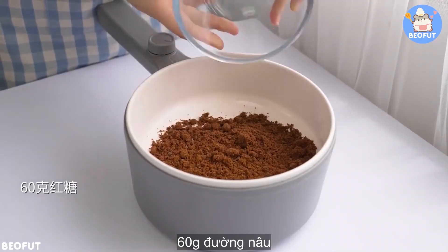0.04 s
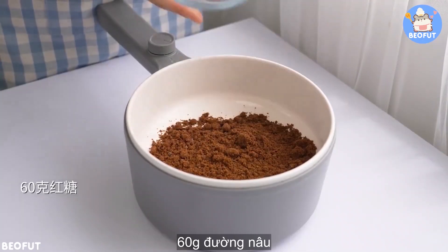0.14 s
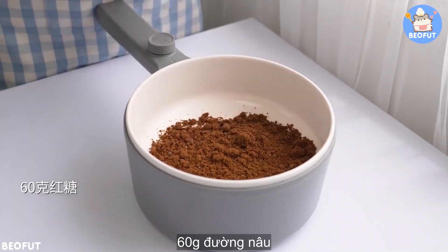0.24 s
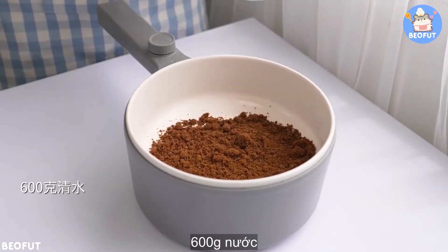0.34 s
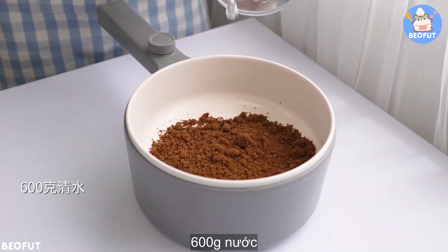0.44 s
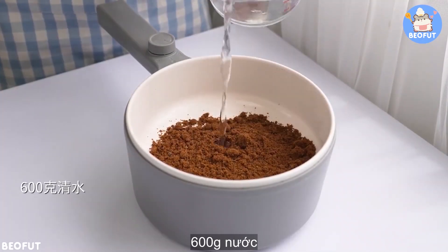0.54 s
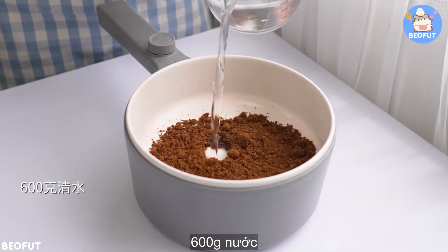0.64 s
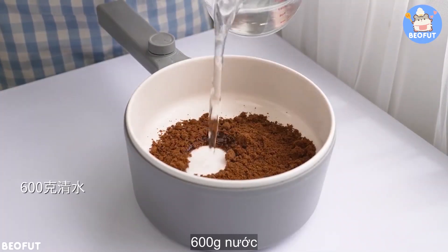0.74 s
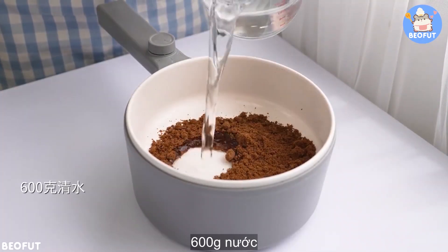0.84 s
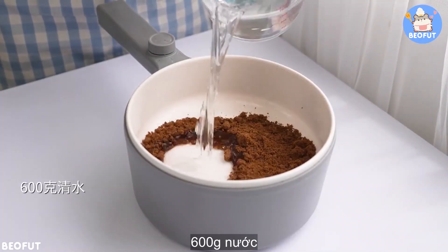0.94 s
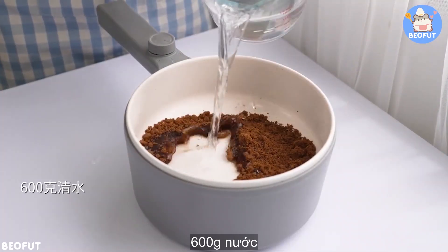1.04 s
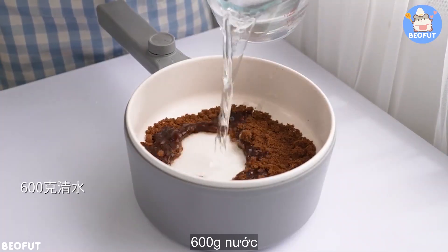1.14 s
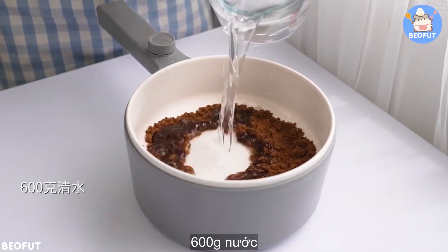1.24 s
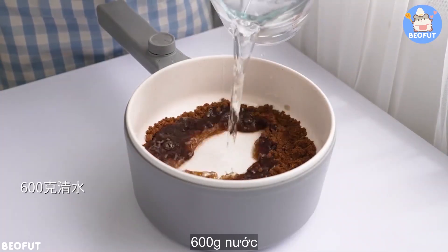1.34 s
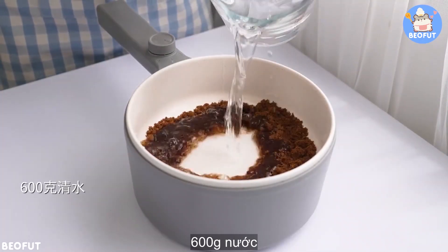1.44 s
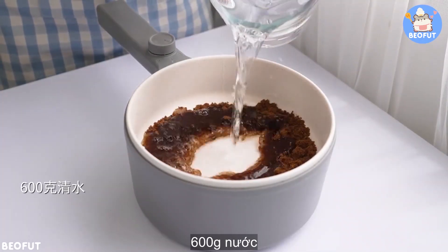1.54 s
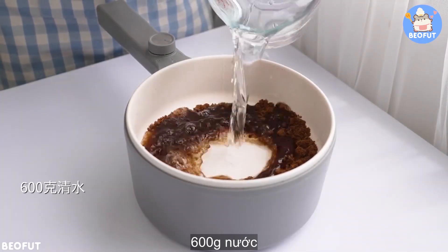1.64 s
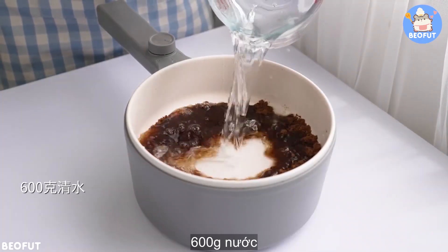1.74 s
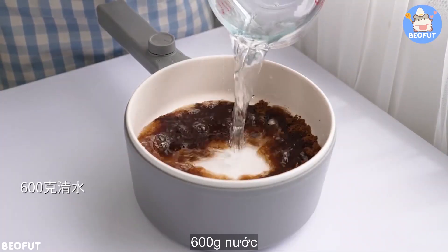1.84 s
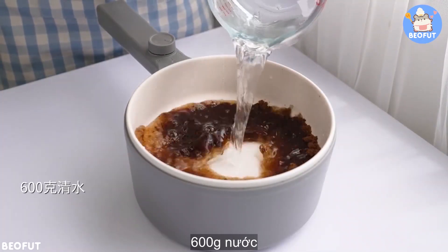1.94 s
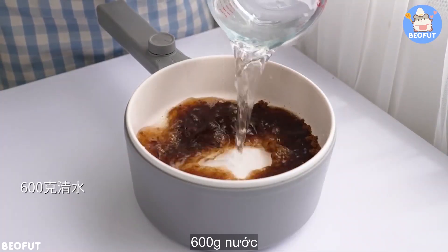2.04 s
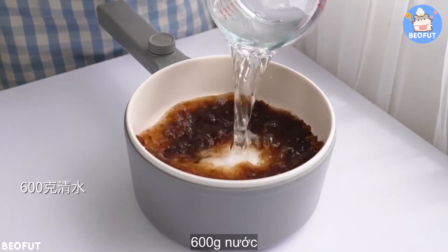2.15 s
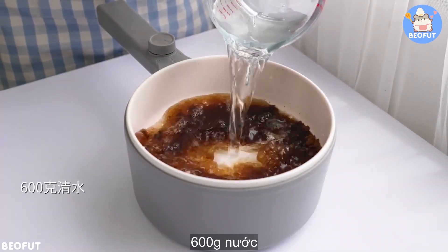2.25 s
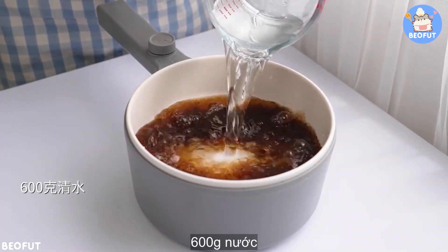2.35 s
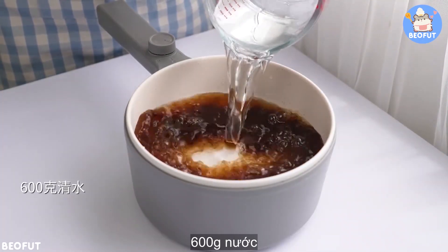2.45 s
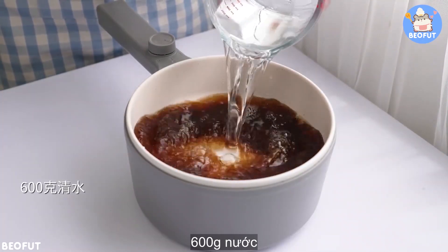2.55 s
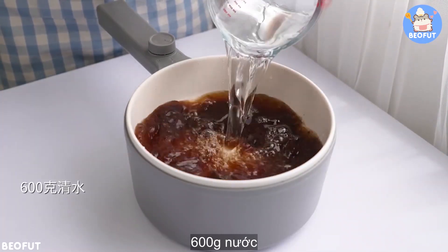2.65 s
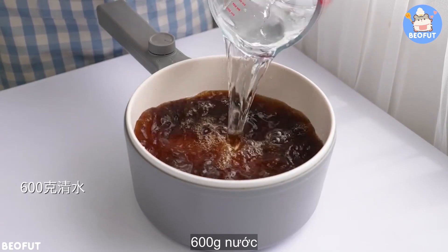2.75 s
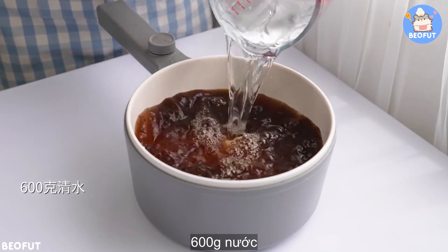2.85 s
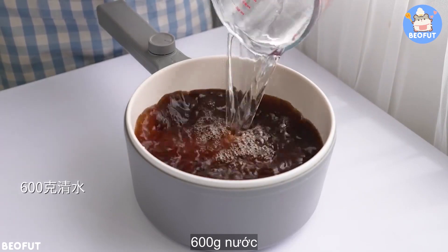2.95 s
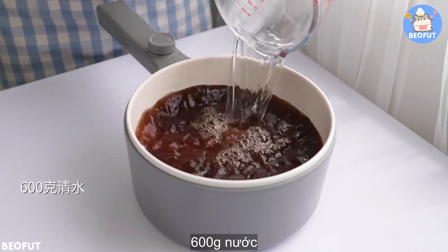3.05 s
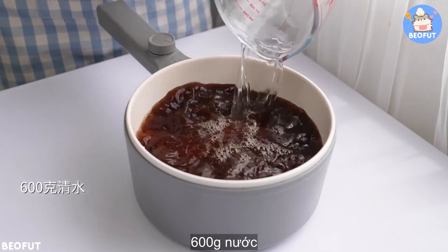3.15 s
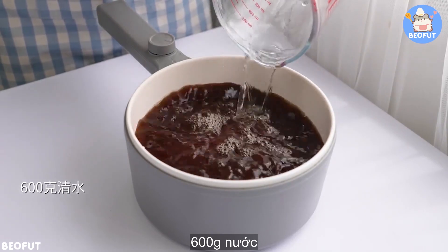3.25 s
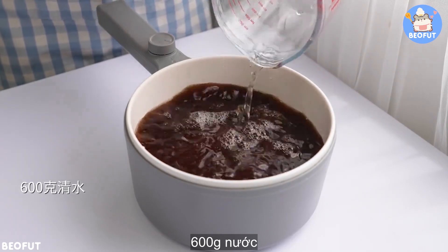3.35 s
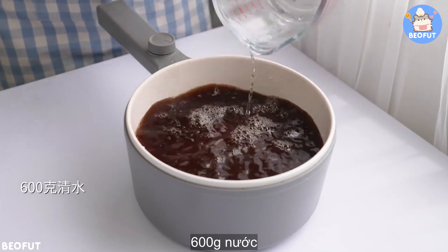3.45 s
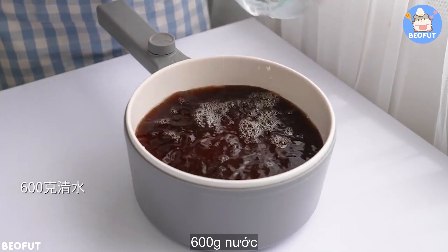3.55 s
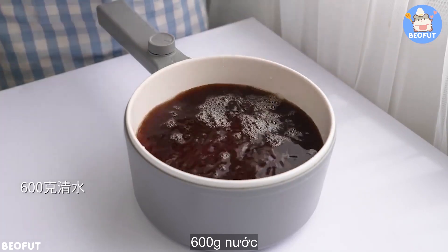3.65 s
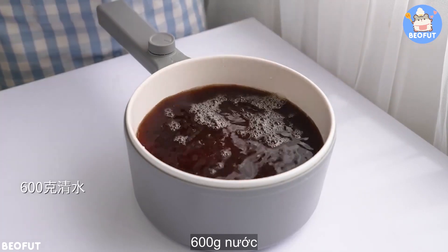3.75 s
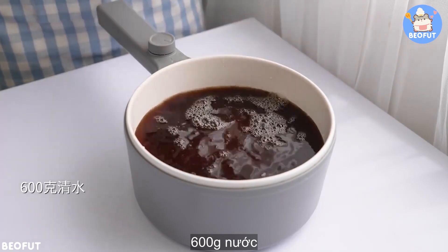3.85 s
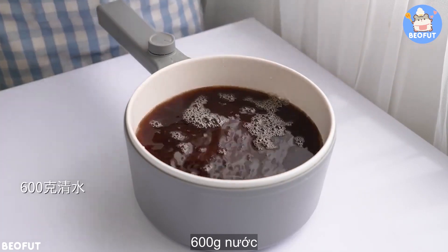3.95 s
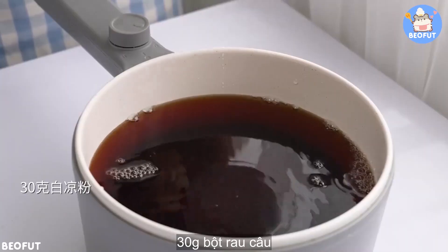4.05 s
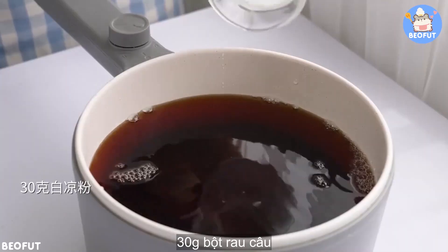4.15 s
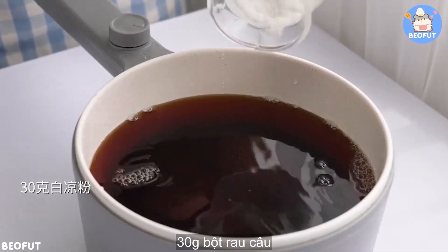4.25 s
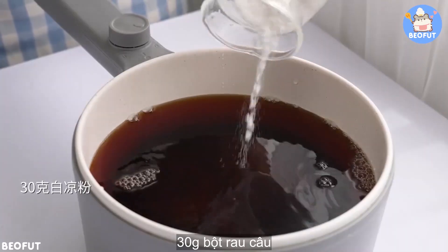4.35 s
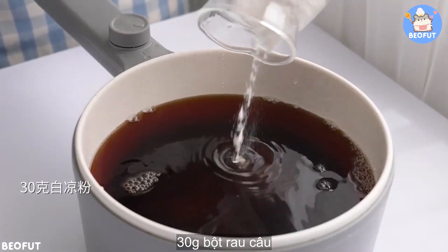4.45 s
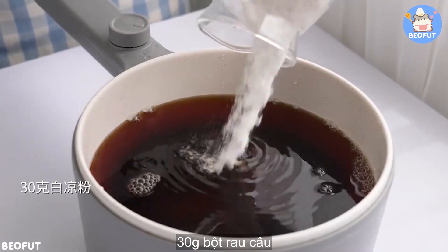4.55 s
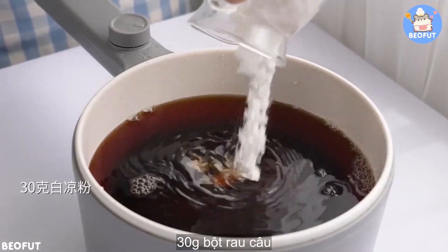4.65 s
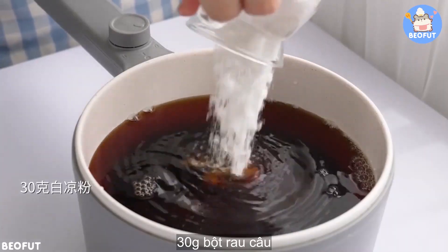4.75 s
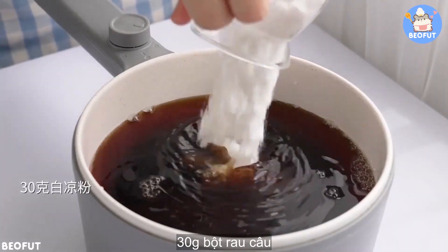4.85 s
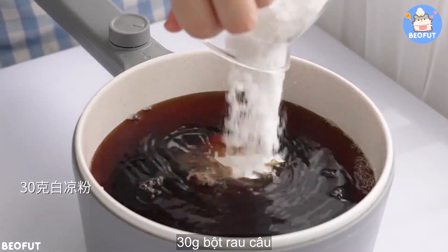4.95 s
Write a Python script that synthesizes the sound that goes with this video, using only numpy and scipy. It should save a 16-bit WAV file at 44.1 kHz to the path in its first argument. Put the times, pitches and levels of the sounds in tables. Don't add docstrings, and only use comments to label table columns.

```python
import sys
import numpy as np
from scipy import signal
from scipy.fft import rfft, irfft
from scipy.io import wavfile
from scipy.ndimage import uniform_filter1d

SR = 44100
rng = np.random.default_rng(int(sys.argv[2]) if len(sys.argv) > 2 else 0)


def file_out(sig):
    cols = np.atleast_2d(sig).T
    lim = np.clip(cols, -1, 1)
    pcm = np.round(lim * 32767).astype(np.int16)
    wavfile.write(sys.argv[1], SR, pcm)


def attenuation_scalar(level_db):
    decades = np.asarray(level_db, float) / 20
    return 10 ** decades


N = 221107
POURING_SAMPLES = 4 * SR

# time_s, flow_db
FLOW = [(0.68, -23), (0.73, -11.5), (0.85, -13), (0.92, -9.5), (1.07, -6), (1.36, 0.5), (1.57, -4.5),
        (1.79, -1.5), (2.18, -3), (2.52, -0.5), (2.72, -5.5), (2.89, -12), (3.06, -15), (3.3, -6),
        (3.45, -9.5), (3.655, -13.5), (3.72, -20)]
# freq_hz, density_db_per_hz
FROTH_COLOUR = [(590, -58), (1000, -10.5), (1370, 9.5), (1750, -6), (2050, -12), (2470, -12), (2680, -14),
                (2940, -10.5), (3500, -11.5), (3800, -13.5), (6700, -14.5), (7620, -11), (13900, -13),
                (15100, -10), (16000, -16.5)]


def evened(x):
    return x / np.sqrt(np.mean(x ** 2) + 1e-20)


def read(points, hz):
    f, value = np.transpose(points)
    return np.interp(np.log(hz + 1), np.log(f + 1), value)


def curve(rows):
    rows = np.array(rows)
    return attenuation_scalar(np.interp(np.arange(N) / SR, rows[:, 0], rows[:, 1], -120, -120))


def add(mix, start_s, sound, pan_db):
    part = mix[:, round(start_s * SR):][:, :len(sound)]
    part += attenuation_scalar(np.array([[pan_db / 2], [-pan_db / 2]])) * sound[:part.shape[1]]


def noise(colour, same, patchy_db, size=512, lean=((1, 0), (2, 0)), wide=6, long=10):
    hz = np.fft.rfftfreq(size, 1 / SR)
    a, b, c, d, patches = rng.standard_normal((4 * N // size + 5, len(hz), 5)).T
    patches = uniform_filter1d(patches, size=int(wide), axis=0)
    patches = evened(uniform_filter1d(patches, size=int(long), axis=1))
    same = np.clip(same(hz) * np.ones(len(hz)), 0, .96)[:, None]
    left = a + 1j * b
    z = np.array([left, same * left + np.sqrt(1 - same ** 2) * (c + 1j * d)])
    z *= attenuation_scalar(colour(hz)[:, None] + patchy_db * patches)
    z *= attenuation_scalar(np.array([.5, -.5])[:, None, None] * read(lean, hz)[:, None])
    return evened(signal.istft(z, nperseg=size, noverlap=3 * size // 4)[1][:, :N])


def ring(hz, cycles, rise=0.0016):
    turns = np.arange(int(5 * cycles * SR / hz) + 2) * hz / SR
    u = turns / (1.56 * cycles)
    envelope = (u * np.exp((1 - u ** 1.57) / 1.18)) ** 2.04
    return envelope * np.sin(2 * np.pi * turns * (1 + rise * turns / 2))


def burst(rows, t60_s, broad, lean_db, crack):
    mix = np.zeros((2, N))
    t = np.arange(2048) / SR
    hz = np.fft.rfftfreq(2048, 1 / SR)
    for (start_s, db, top_hz), spray in zip(rows, rng.standard_normal((len(rows), 2048))):
        hump = np.exp(-((hz - top_hz) / (.15 * top_hz)) ** 2)
        colour = 1 / (1 + (2500 / (hz + 1)) ** 4) * (broad + 0.8 * hump)
        shape = attenuation_scalar(db - 7.5 - 60 * t / max(t60_s, .004)) * np.minimum(t / 0.0019, 1) ** 1.2
        shape *= 1 + crack * np.exp(-((t - .002) / 0.0005) ** 2)
        add(mix, start_s - .0010, shape * evened(irfft(rfft(spray) * colour)), lean_db + 7.4 * spray[0])
    return mix


def swarm(lo_hz, hi_hz, per_s, cycles, spread_db, count=16):
    mix = np.zeros((2, N))
    for hz in np.geomspace(lo_hz, hi_hz, count):
        when, size, side, chance = rng.random((1500, 4)).T
        born = chance < per_s / count * POURING_SAMPLES / SR / len(when)
        size = attenuation_scalar(spread_db * np.minimum(-np.log(size + 1e-9), 4.5))
        grain = ring(hz, cycles)
        grain = attenuation_scalar(read(FROTH_COLOUR, hz)) * np.sqrt(hz) * grain / np.linalg.norm(grain)
        starts = (when[born] * POURING_SAMPLES).astype(int)
        places = (starts[:, None] + np.arange(len(grain))).ravel()
        for ear, lean in enumerate([side - .6, .6 - side]):
            gains = (size * attenuation_scalar(8.0 * lean))[born]
            mix[ear] += np.bincount(places, np.outer(gains, grain).ravel(), N)
    return evened(mix)


def slide():
    trickle_db, trickle_t60_s, wait_db = -40.5, .12, -56.5
    slide_s, slide_db, rise_s, run_out_db, run_out_s = 0.051, -25.5, 0.00088, -59, 0.3
    lump_s, lump_db, lump_half_s = 0.058, -22, 0.004
    t = np.arange(N) / SR
    since = np.maximum(t - slide_s, 0)
    run_db = np.maximum(slide_db + run_out_db * (since / run_out_s) ** 2.09, -200)
    run = np.minimum(since / rise_s, 1) * attenuation_scalar(run_db)
    lump = attenuation_scalar(lump_db) * np.exp(-((t - lump_s) / lump_half_s) ** 2)
    trickle = attenuation_scalar(trickle_db - 60 * np.minimum(t, 1) / trickle_t60_s) + attenuation_scalar(wait_db)
    return trickle * (t < slide_s) + run + lump


def sugar():
    # freq_hz, density_db_per_hz
    grit_colour = [(2940, -27), (5000, -36), (5810, -49), (5900, -31.5), (6600, -17), (6930, -12.5),
                   (9410, -5), (14300, -12), (15200, -26), (16000, -54)]
    dull_hz, dull_s = 12100, .13
    grit = noise(lambda hz: read(grit_colour, hz), lambda hz: .8, 1.2, size=256, wide=7, long=9.6)
    dull = signal.sosfiltfilt(signal.butter(6, dull_hz, fs=SR, output="sos"), grit)
    grit = dull + (grit - dull) * 0.6 * np.exp(-(np.arange(N) / SR / dull_s) ** 2)
    rattle = attenuation_scalar(0.3 * evened(uniform_filter1d(rng.standard_normal(N), size=30)))
    grains = evened(grit * rattle) * slide() * attenuation_scalar(np.array([[-1.2], [1.2]]))
    return signal.sosfilt(signal.butter(2, 4500, "high", fs=SR, output="sos"), grains)


def background():
    # freq_hz, density_db_per_hz
    air_colour = [(15, -51), (25, -18), (43, -6.5), (114, -7), (373, -12), (427, -7), (659, -5),
                  (1020, 1.5), (2110, -10), (3340, -20), (6050, -25.5), (6560, -21), (10100, -31.5),
                  (14800, -34.5), (16000, -50)]
    # freq_hz, likeness_0_to_1
    air_same = [(60, 1), (130, 1), (290, 0.89), (640, 0.75), (1410, 0.16), (3100, 0.53), (6820, 0.26),
                (15000, 1)]
    # freq_hz, left_minus_right_db
    air_lean = [(60, 0), (180, -0.5), (550, -0.5), (1650, -3.5), (4970, 0.5), (15000, -2.5)]
    # freq_hz, rms_db
    whine_lines = [(6412, -68), (7052, -76), (7267, -84)]
    # centre_s, peak_db, pitch_hz, half_length_s
    table_knock = (2.44, -44, 54, .06)
    # start_s, peak_db
    wall_ticks = [
        (1.8494, -18),
    ]
    cut_s, air_db, near_air_db, air_rise_db_per_s = 4.13, -53.5, -51.5, 2
    hiss_db, hiss_rise_db_per_s, near_hiss_db, duck_db = -62.5, 3.4, -87.5, -12.5
    dust_db, dust_t60_s = -45, 0.98
    t = np.arange(N) / SR
    far = t < cut_s

    air = noise(lambda hz: read(air_colour, hz), lambda hz: read(air_same, hz), 2.1, size=2048, lean=air_lean)
    air = air * attenuation_scalar(3.0 + np.where(far, air_db, near_air_db + air_rise_db_per_s * (t - cut_s)))
    rumble = noise(lambda hz: -40 * (hz > 130) - 30 * (hz < 35), lambda hz: .92, 14.0, size=4096)
    rumble = attenuation_scalar(-70.0) * rumble

    def hiss_colour(hz):
        return -25 / (1 + (hz / 2200) ** 4) + 6.2 * np.exp(-((hz - 8000) / 2000) ** 2)

    steady_db = np.where(far, hiss_db + hiss_rise_db_per_s * (t - 2.5), near_hiss_db)
    steady = attenuation_scalar(steady_db + duck_db * curve(FLOW) ** 0.33)
    hiss = noise(hiss_colour, lambda hz: .6, 1.2) * (steady + attenuation_scalar(dust_db - 60 * t / dust_t60_s))
    whine = sum(attenuation_scalar(db) * np.sqrt(2) * np.sin(2 * np.pi * (hz * t + rng.random())) for hz, db in whine_lines)
    centre_s, db, hz, half_s = table_knock
    knock = attenuation_scalar(db) * np.exp(-((t - centre_s) / half_s) ** 2) * np.sin(2 * np.pi * hz * t)
    mix = air + rumble + hiss + whine + knock
    for start_s, db in wall_ticks:
        add(mix, start_s, attenuation_scalar(db) * np.hanning(9), 0)
    return mix


def stream():
    # full_flow_db, db_per_db_of_flow, deep_pan_gain_db
    size_response = [
        (-35.5, 2.55, 11.5),
        (-32, 1.84, 4.5),
        (-28, 1.75, -3),
        (-40, 2.5, -0.5),
    ]
    # time_s, level_db
    dribble_level = [(2.86, -65), (2.92, -48), (3.3, -38), (3.62, -53.5), (3.7, -78)]
    fill_start_s, fill_s = 0.97, 1.8
    deep = swarm(1295, 1850, 160, 3.0, 3.1, count=8)
    gurgle = swarm(1947, 2817, 2000, 5.36, 3.1, count=10)
    froth = swarm(2923, 5840, 4500, 5.1, 5.6)
    hiss = noise(lambda hz: read(FROTH_COLOUR, hz) - 30 / (1 + (hz / 5500) ** 8), lambda hz: .8, 5.0,
                 size=256, wide=44, long=4)
    spray = 1.23 * swarm(6200, 15500, 2700, 14.0, 3.4) + 0.75 * hiss * attenuation_scalar(np.array([[-1.5], [1.5]]))
    dribble = swarm(3150, 3880, 1500, 7.0, 6.1, count=7) * curve(dribble_level)
    depth = np.clip((np.arange(N) / SR - fill_start_s) / fill_s, 0, 1)
    mix = dribble
    for layer, (full_db, follow, deep_db) in zip([gurgle, froth, spray, deep], size_response):
        mix = mix + layer * curve(FLOW) ** follow * attenuation_scalar(full_db + deep_db * depth)
    return mix


def crackle():
    # start_s, peak_db
    snaps = [(0.703, -49), (0.7183, -41), (0.8866, -22), (0.922, -18), (0.941, -19), (0.9848, -21),
             (1.072, -24), (1.083, -14), (1.1624, -26), (1.1993, -22), (1.5838, -33), (1.6923, -9.5),
             (2.0178, -15), (2.0677, -9), (2.132, -3), (2.2678, -18), (2.2933, -13), (2.3824, -3.5),
             (2.4524, -10), (2.628, -30), (3.273, -22), (3.3224, -16), (3.3304, -21), (3.3555, -19),
             (3.3772, -12.5), (3.4058, -20), (3.4444, -20), (3.6474, -33)]
    per_s, level_db, follow, spread_db, width = 220, -33, 1.58, 4.0, 0.21
    when, size, side = rng.random((int(per_s * 4), 3)).T
    at = (when * POURING_SAMPLES).astype(int)
    size = attenuation_scalar(spread_db * np.minimum(-np.log(size + 1e-9), 3.5))
    size = size * attenuation_scalar(level_db) * curve(FLOW)[at] ** follow
    t, mix = np.arange(300) / SR, np.zeros((2, N))
    band = signal.butter(2, [2600, 13000], "bandpass", fs=SR, output="sos")
    fizz = signal.sosfilt(band, rng.standard_normal((len(at) + 60, 300)))
    hz = np.fft.rfftfreq(300, 1 / SR)
    top_hz = 3500 * 4 ** rng.random((len(at), 1))
    colour = .06 + np.exp(-(np.log((hz + 1) / top_hz) / width) ** 2)
    fizz[:len(at)] = irfft(rfft(fizz[:len(at)]) * colour)
    fizz = fizz * (attenuation_scalar(-60 * t / 0.0035) + 0.11 * attenuation_scalar(-60 * t / 0.012))
    fizz /= abs(fizz).max(axis=1, keepdims=True)
    for k in range(len(at)):
        add(mix, at[k] / SR, size[k] * fizz[k], -2.5 + 8.0 * (side[k] - .5))
    for k, (start_s, db) in enumerate(snaps):
        add(mix, start_s, attenuation_scalar(db - 4.5) * fizz[-1 - k], -2.5)
    return mix


def splashes():
    # start_s, peak_db, brightest_hz
    patter = [(.735, -39, 3200), (.7675, -20, 3060), (.7685, -40, 4270), (.78, -27, 3530),
              (.792, -31, 3700), (.808, -35, 2980), (.82, -40, 3900), (.862, -33, 3340),
              (.872, -31.5, 2600), (.889, -30, 5230), (.9075, -24.5, 2830), (.9075, -19.5, 4500),
              (.921, -27, 2800), (.929, -28, 4200), (.941, -22, 4200), (.9535, -21.5, 4180),
              (.955, -30, 2700), (.986, -29, 5430), (.998, -33, 2650), (1.02, -49, 4020),
              (1.033, -40, 2700), (1.044, -42, 2760)]
    # start_s, peak_db, brightest_hz
    splash = [(1.0062, -25.5, 10700), (1.1156, -12, 7900), (1.1485, -8, 15000), (1.196, -14, 7840),
              (1.2169, -7.5, 15100), (1.2662, -17, 14700), (1.35, -24.5, 11400), (1.3892, -14.5, 7650),
              (1.4187, -25, 8160), (1.4367, -6, 7500), (1.506, -14.5, 7550), (1.5283, -20, 7500),
              (1.622, -23, 13200), (1.6512, -20.5, 8100), (1.7279, -12, 7460), (1.749, -13, 7800),
              (1.7642, -11.5, 14600), (1.8484, -13.5, 9600), (1.8893, -14.5, 8100), (1.9913, -17.5, 6800),
              (2.0075, -12, 8300), (2.1173, -13, 9200), (2.1966, -17.5, 11600), (2.3155, -13, 9800),
              (2.37, -10, 9700), (2.6411, -23, 11000), (2.7967, -25, 14200), (2.8216, -24, 11800)]
    # start_s, peak_db, brightest_hz
    drips = [(3.1762, -19.5, 6300), (3.2089, -17.5, 8150), (3.256, -22.5, 7400), (3.2742, -20, 8500),
             (3.3149, -5, 10200), (3.3435, -15.5, 8650), (3.3555, -12.5, 10000), (3.4047, -23.5, 7450),
             (3.5745, -29, 6300), (3.622, -28, 15200)]
    return (burst(splash, 0.048, 0.49, -2.6, 0.87) + burst(drips, 0.022, 0.49, -1.8, 0.98)
            + burst(patter, 0.031, 0.069, 0.41, 0.52))


def specks():
    # start_s, peak_db, brightest_hz
    droplets = [(1.2014, -11, 10200), (1.2944, -6, 5500), (1.6252, -13, 13300), (1.8628, -9, 7650),
                (1.9664, -11, 6640), (2.0176, -6, 13600), (2.2687, -13, 10500), (2.2937, -22, 11000),
                (2.5134, -10, 8490), (2.417, -6, 7600), (2.201, -11, 12500), (2.641, -10, 10500),
                (2.071, -12, 11000), (2.5790, -27, 8520), (2.7144, -18, 10700), (2.7790, -30, 10900),
                (2.9537, -32, 5390), (3.0275, -38, 14700), (3.1851, -18, 6310), (3.2274, -21, 10500),
                (3.3600, -18, 9500), (3.3305, -13, 9000), (3.4534, -34, 6850), (3.5862, -22, 5950),
                (1.0205, -19, 10840), (1.1495, -5, 5030), (1.4375, -7.5, 4500), (1.668, -5.5, 4500),
                (3.381, -28, 5000), (3.43, -29, 5200), (3.503, -34, 6000), (3.548, -31, 5000),
                (3.606, -41, 4170)]
    return burst(droplets, .012, 0.19, -2.3, 0.7)


def bubbles():
    # start_s, peak_db, pitch_hz, ring_cycles
    big = [
        (1.514, -20, 687, 4.8),
        (1.68, -21, 745, 3.54),
        (2.361, -21, 1113, 5.2),
        (2.789, -34, 808, 3.7),
    ]
    # start_s, peak_db, pitch_hz, ring_cycles
    smaller = [(1.0727, -30, 2050, 5.9), (1.096, -21.5, 1347, 6.7), (1.15, -25, 1770, 3.1),
               (1.219, -30, 1300, 6.3), (1.236, -21.5, 1390, 9.7), (1.2974, -16.5, 1500, 2.9),
               (1.349, -12, 1362, 7.9), (1.385, -7, 1594, 2.2), (1.436, -20, 1374, 5),
               (1.505, -6, 1417, 4.3), (1.6656, -13.5, 1424, 4), (2.0008, -28, 1320, 5.5),
               (2.0899, -31.5, 1555, 3.5), (2.1436, -21, 1380, 4.8), (2.301, -23, 1900, 3.8),
               (2.3074, -11, 1635, 1.8), (2.384, -5, 1397, 6.8), (3.151, -36, 1487, 4.9),
               (3.166, -24, 1610, 1.3), (3.181, -28.5, 1710, 4.3), (3.4937, -31.5, 1660, 2.3),
               (3.582, -32, 1370, 2.3), (3.6232, -29, 1390, 4), (3.649, -25.5, 1570, 1.8),
               (1.136, -23, 3130, 5), (1.149, -19, 2840, 2), (1.278, -22.5, 2450, 6.6),
              (1.294, -14.5, 2770, 7.6), (1.306, -11, 2500, 3.5), (1.3484, -16, 2520, 1.8),
              (1.3633, -8.5, 2090, 1.5), (1.3778, -8.5, 2250, 1.6), (1.4385, -4, 2627, 5.5),
              (1.6073, -24.5, 2020, 7.9), (1.656, -18, 2040, 3), (1.668, -15.5, 2490, 2.3),
              (1.715, -26, 2980, 11.5), (1.7519, -36, 2060, 4.6), (1.7988, -20, 2060, 7.3),
              (1.8139, -4.5, 2326, 3), (1.9056, -15, 2120, 5), (1.938, -16, 2040, 6.6),
              (1.966, -19.5, 2230, 4.6), (2.3057, -15.5, 2023, 5.3), (2.4838, -26, 2220, 5.1),
              (2.572, -13.5, 2090, 4.6), (2.5997, -16.5, 2070, 4.2), (2.6317, -23.5, 1983, 19),
              (2.6731, -17, 2150, 3.4), (2.6823, -20, 2790, 8.4), (2.7083, -16, 2610, 3),
              (3.2391, -27, 2040, 2.7), (3.2994, -28, 1930, 2.6), (3.5755, -27.5, 2040, 2.7),
               (1.1487, -11, 3800, 2.2), (1.216, -14, 4730, 3), (1.2974, -16, 3060, 8.2),
             (1.35, -19.5, 3250, 13), (1.437, -12, 3230, 3), (1.624, -22, 3270, 7),
             (1.6376, -19, 3000, 3.7), (1.6611, -16.5, 3440, 3.9), (1.695, -13, 5400, 1.2),
             (1.786, -11.5, 5850, 4.5), (1.8496, -10, 3340, 2.6), (1.9044, -13, 3500, 7),
             (2.064, -17.5, 3500, 3.9), (2.1147, -10, 5440, 3.8), (2.193, -13.5, 3300, 3),
             (2.311, -14, 6000, 2.6), (2.3831, -14, 5040, 3.8), (2.413, -13, 3280, 3.2),
             (2.448, -8.5, 3420, 7.1), (2.585, -14.5, 4020, 4.6), (2.649, -28.5, 3260, 12),
             (3.1028, -15, 5540, 4.4), (3.1381, -26, 3520, 4.9), (3.241, -23, 3670, 1.6),
             (3.276, -20, 3720, 0.97), (3.3194, -20.5, 3520, 5.1), (3.359, -29, 3180, 5.5),
             (3.395, -18.5, 4220, 4.1), (3.534, -33, 3700, 1.8), (3.582, -21, 3430, 4.7)]
    mix, rows = np.zeros((2, N)), big + smaller
    for (start_s, db, hz, cycles), (near, late, side) in zip(rows, rng.uniform(-1, 1, (len(rows), 3))):
        pan_db = -.8 * np.log2(hz / 1200) + 1.9 * side * min(hz / 2500, 1)
        add(mix, start_s - .0008, attenuation_scalar(db - 1.0) * ring(hz, max(cycles, .6)), pan_db)
        neighbour_db = db - 8.5 - 2.2 * (hz < 1450) - 9.0 * (hz < 900)
        neighbour = attenuation_scalar(neighbour_db) * ring(hz * (1 + 0.13 * near), 4.83)
        add(mix, start_s + 0.0054 * abs(late), neighbour, pan_db)
    return mix


def faint_bubbles():
    # start_s, peak_db, pitch_hz, ring_cycles, climb_per_cycle
    faint = [(1.178, -42, 2470, 4.2, .002), (1.236, -22.5, 3370, 6.2, 0), (1.255, -29, 1390, 2.9, 0.0057),
             (1.322, -23, 1430, 7.9, 0), (1.335, -37.5, 775, 3.8, 0.013), (1.367, -19, 4970, 6.9, 0.0056),
             (1.395, -14, 2310, 3.1, 0.014), (1.419, -8.5, 7900, 2.2, 0.0052),
             (1.506, -22.5, 1990, 3, 0.0094), (1.623, -25, 2660, 6.4, 0), (1.672, -25.5, 1558, 16, 0.0044),
             (1.697, -32, 769, 3, 0.011), (1.733, -46, 800, 4.5, 0.021), (1.751, -21.5, 2680, 6.4, 0.0055),
             (1.755, -28.5, 1980, 7.9, 0.0045), (2.07, -19, 4630, 6.2, 0), (2.165, -25.5, 1420, 5, 0.0014),
             (2.21, -21, 2410, 2.3, .002), (2.248, -25, 3200, 3.3, 0.0082), (2.32, -22, 1354, 10.4, 0.0032),
             (2.41, -30, 1390, 4.3, 0.002), (2.462, -24.5, 3430, 8.3, 0.019),
             (2.51, -20.5, 2057, 7.3, 0.0029), (3.256, -33, 1994, 13, 0.0017), (3.324, -34, 2030, 7.2, 0),
             (3.329, -34.5, 1280, 4.7, 0.0099), (3.3546, -34, 1720, 5.1, 0), (3.4055, -37.5, 1430, 3.2, 0),
             (3.405, -23, 3910, 8.1, 0.0048), (3.434, -30.5, 4440, 6.8, 0.0074),
             (3.4464, -37, 1520, 4.6, .002), (3.474, -32.5, 4830, 4.2, 0), (3.5257, -38, 1700, 4.1, 0.0047),
             (3.54, -32, 3370, 7.5, 0.0054), (3.558, -33.5, 3980, 5, 0.0076),
             (3.586, -34, 5900, 8.1, 0.0014), (3.385, -44.5, 722, 7.8, 0.00033)]
    mix = np.zeros((2, N))
    for start_s, db, hz, cycles, climb in faint:
        add(mix, start_s - .0008, attenuation_scalar(db) * ring(hz, cycles, climb), -.9 * np.log2(hz / 1200))
    return mix


def kitchen(x, wet_db):
    # freq_hz, t60_s
    room_decay = [(600, 0.27), (2000, 0.26), (6000, 0.097), (15000, 0.074)]
    # freq_hz, level_db
    tail_colour = [(700, 1), (1400, -2), (2500, -5.5), (6000, 13.5), (14000, 15)]
    # delay_s, left_db, right_db
    echoes = [
        (.0032, -17.5, -4.5),
        (.006, -21, -20),
        (.0105, -7, -14),
        (.017, -15, -20),
        (.024, -22, -19),
    ]
    taps = np.zeros((2, SR // 2))
    at = np.arange(200, SR // 2 - 20, 20) + rng.integers(0, 20, (2, (SR // 2 - 201) // 20))
    np.put_along_axis(taps, at, rng.choice([-1., 1.], at.shape), 1)
    hz, t, z = signal.stft(taps, SR, nperseg=256)
    same = (.85 / (1 + (hz / 2500) ** 2))[:, None]
    z[1] = same * z[0] + np.sqrt(1 - same ** 2) * z[1]
    decay_db = read(tail_colour, hz)[:, None] - 60 * t / read(room_decay, hz)[:, None]
    tail = signal.istft(z * attenuation_scalar(decay_db), SR, nperseg=256)[1]
    build_up = np.minimum(np.arange(tail.shape[1]) / SR / 0.026, 1)
    tail *= attenuation_scalar(wet_db - 18.5) * build_up
    tail[:, 0] = 1
    for delay_s, left_db, right_db in echoes:
        tail[0, round(delay_s * SR)] += attenuation_scalar(left_db)
        tail[1, round(delay_s * SR) + rng.integers(-6, 7)] += attenuation_scalar(right_db)
    return signal.fftconvolve(x, tail, axes=1)[:, :N]


def scene():
    water = bubbles() + faint_bubbles() + splashes() + attenuation_scalar(-4.5) * stream()
    return kitchen(water, -0.045) + sugar() + background() + crackle() + specks()


def low_pass(x):
    return signal.sosfilt(signal.butter(12, 16660, fs=SR, output="sos"), x)


def record(dry):
    # start_s, length_s, up_to_hz
    dropouts = [(1.24, 0.081, 566), (1.375, 0.081, 150), (1.458, 0.032, 527), (1.646, 0.033, 450),
                (1.734, 0.043, 450), (1.799, 0.042, 150), (1.865, 0.031, 1600), (1.885, 0.047, 615),
                (1.978, 0.1, 450), (2.359, 0.025, 450)]
    # start_s, length_s, from_hz, to_hz
    holes = [(.16, .13, 12600, 13300), (.19, .05, 13300, 14500), (.034, .012, 3000, 4500),
             (.06, .04, 2150, 2450), (.125, .035, 5800, 6400), (.1, .12, 15200, 16000),
             (.795, .035, 11800, 12200), (.91, .04, 11800, 12200), (1.26, .035, 11400, 12300),
             (1.865, .035, 11400, 12300), (2.71, .07, 6500, 7000), (2.83, .1, 5950, 6300),
             (3.01, .14, 10900, 11500), (3.375, .03, 8450, 8800), (3.52, .045, 6800, 7200),
             (2.51, .065, 11700, 12500), (.06, .13, 5200, 5700), (.06, .06, 3300, 3700)]
    edge_hz = 15550
    hz, t, z = signal.stft(np.tanh(dry / 2.23) * 2.46, SR, nperseg=1024, noverlap=768)
    for start_s, length_s, top_hz in dropouts:
        z[:, hz < top_hz] *= 1 - .97 * np.exp(-((t - start_s - length_s / 2) / (.75 * length_s)) ** 4)
    for start_s, length_s, lo_hz, hi_hz in holes:
        band = (hz > lo_hz) & (hz < hi_hz)
        z[:, band] *= 1 - .96 * np.exp(-((t - start_s - length_s / 2) / (.6 * length_s)) ** 4)
    edge = signal.firwin(511, edge_hz, window=("kaiser", 9), fs=SR)
    thinned = signal.istft(z, SR, nperseg=1024, noverlap=768)[1][:, :N]
    return low_pass(signal.oaconvolve(thinned, edge[None], "same"))


dry = scene()
out = record(dry)
file_out(out)
```